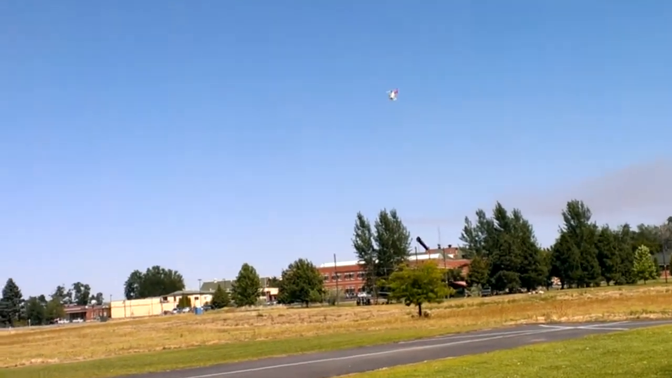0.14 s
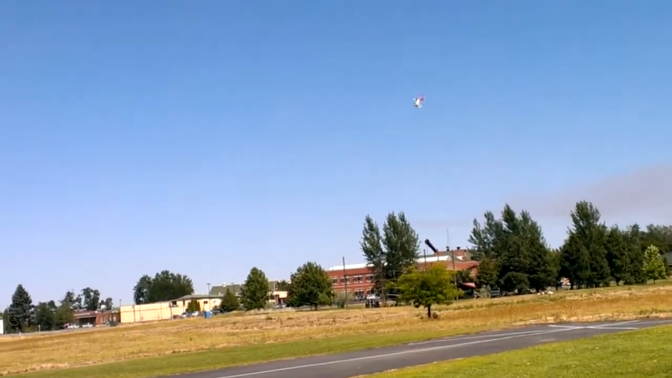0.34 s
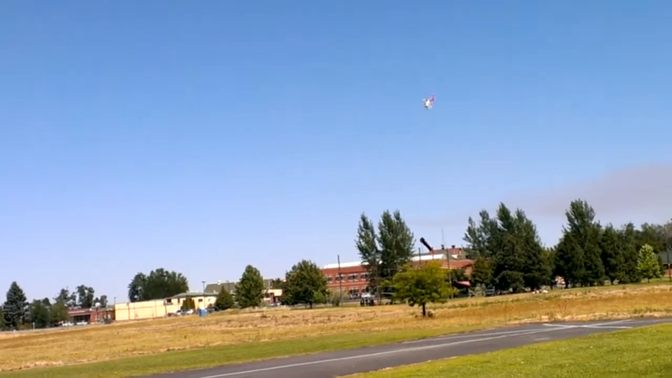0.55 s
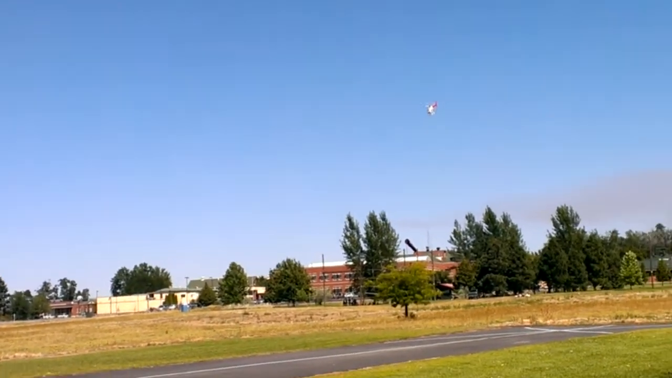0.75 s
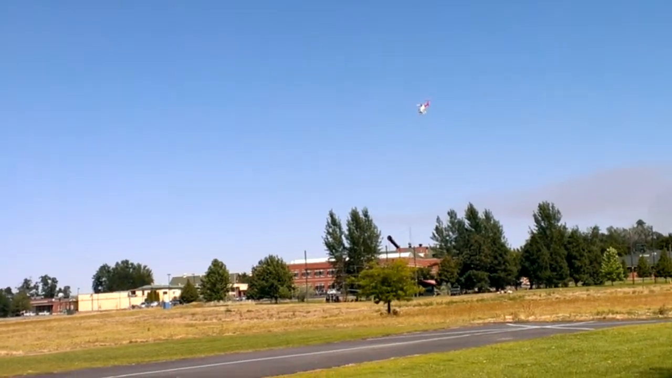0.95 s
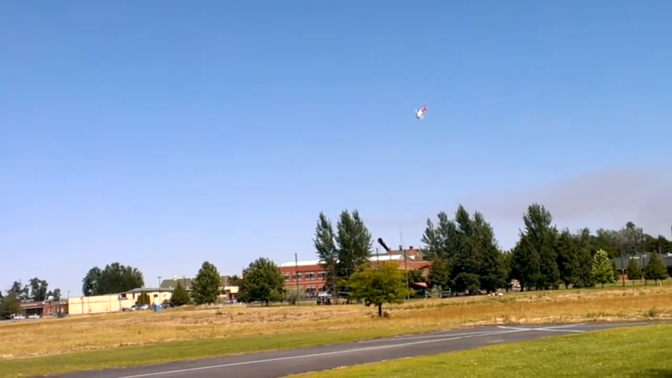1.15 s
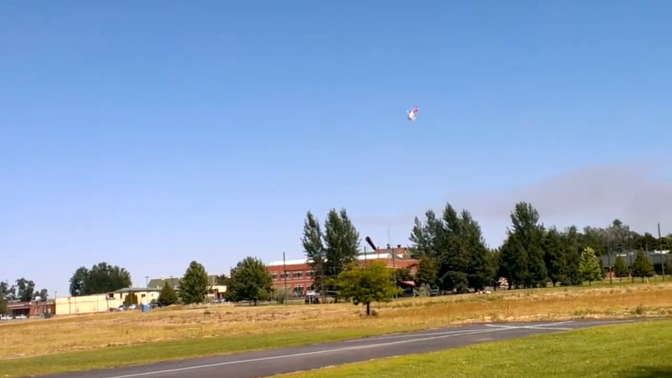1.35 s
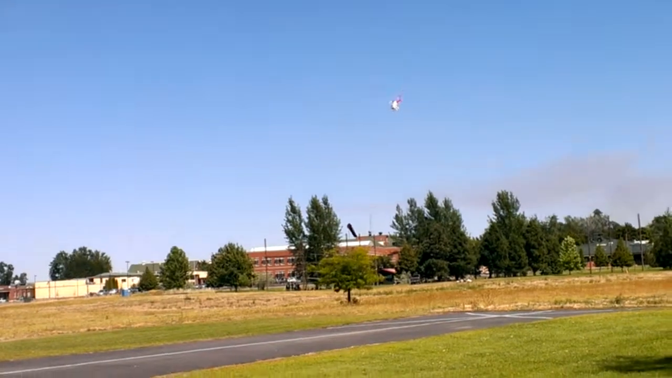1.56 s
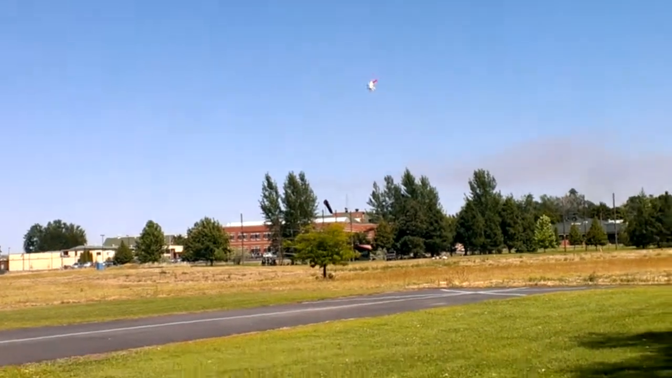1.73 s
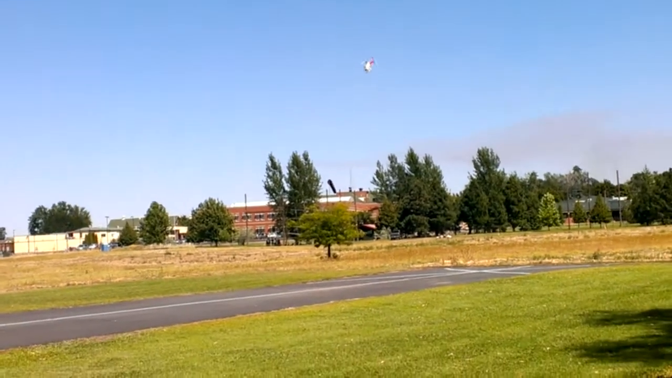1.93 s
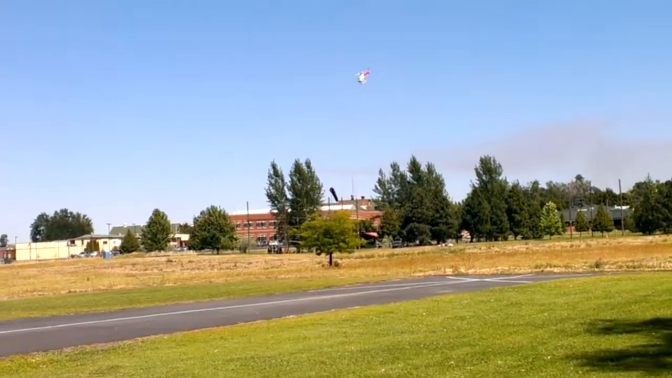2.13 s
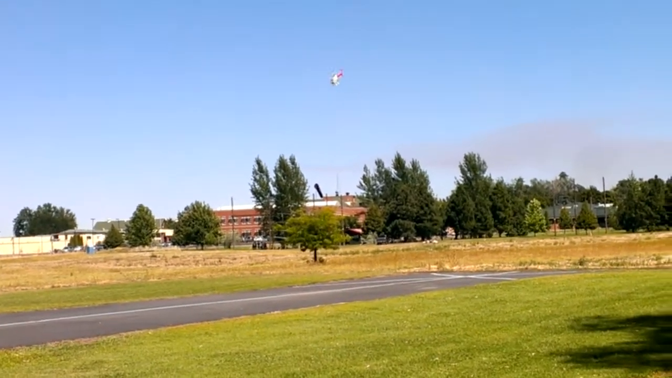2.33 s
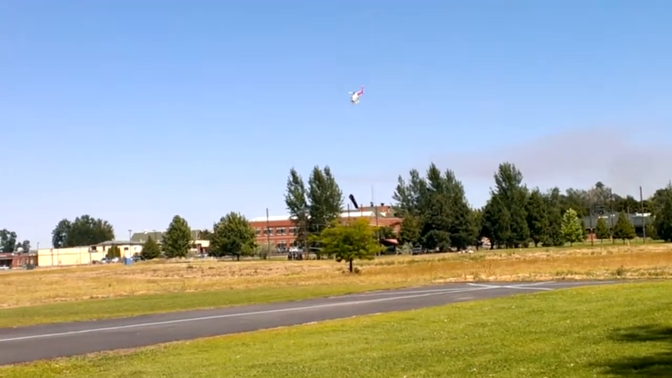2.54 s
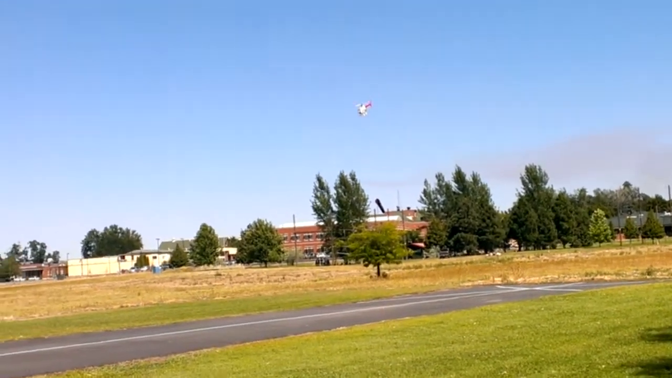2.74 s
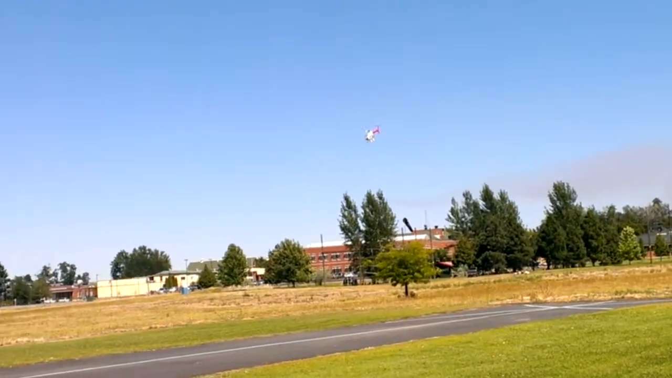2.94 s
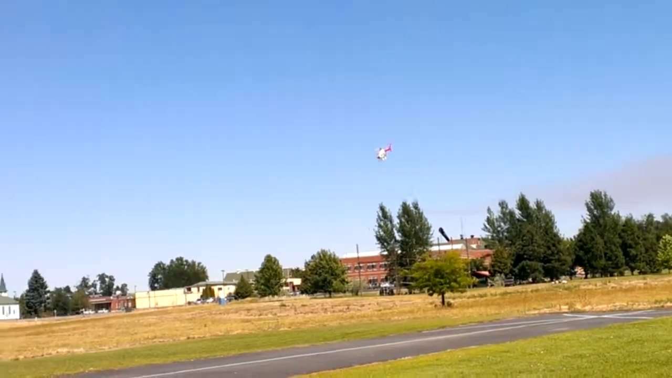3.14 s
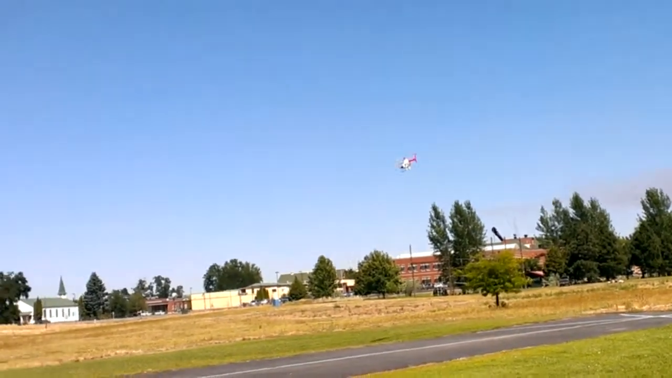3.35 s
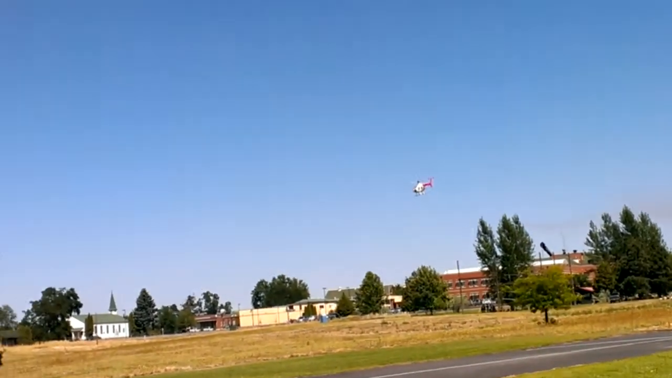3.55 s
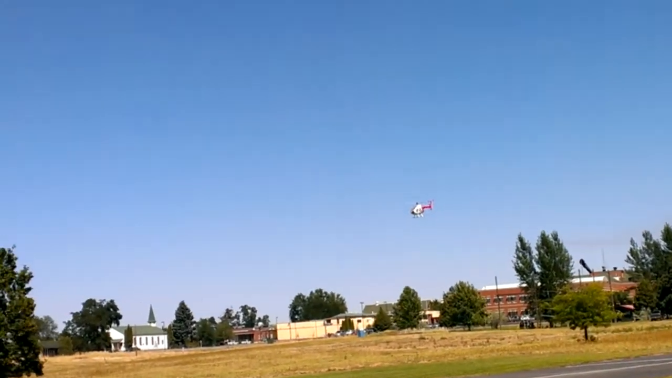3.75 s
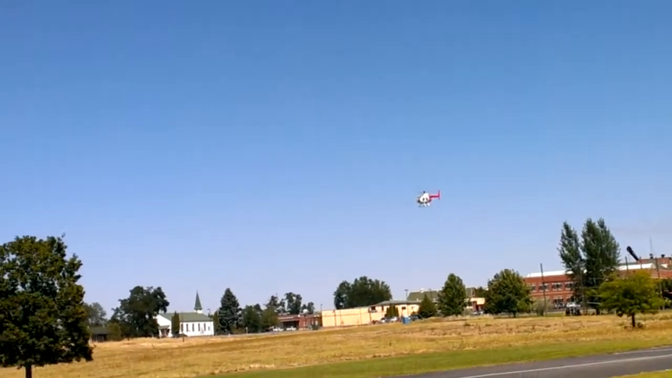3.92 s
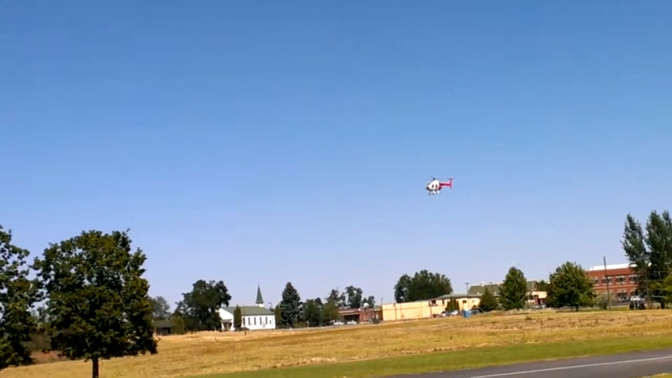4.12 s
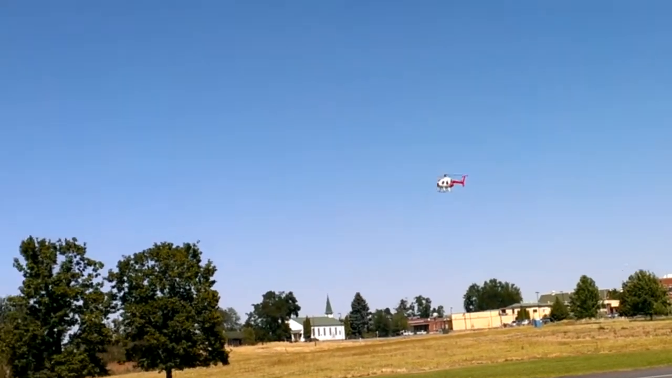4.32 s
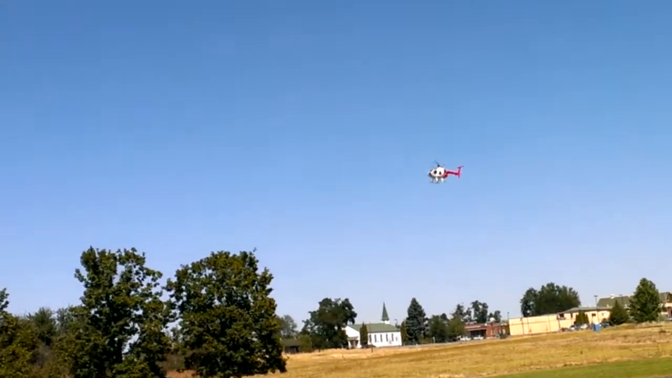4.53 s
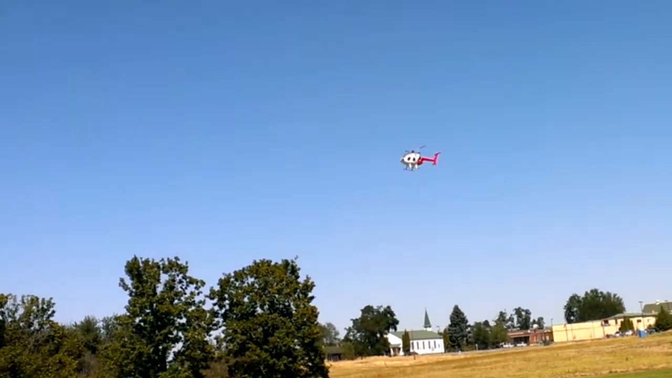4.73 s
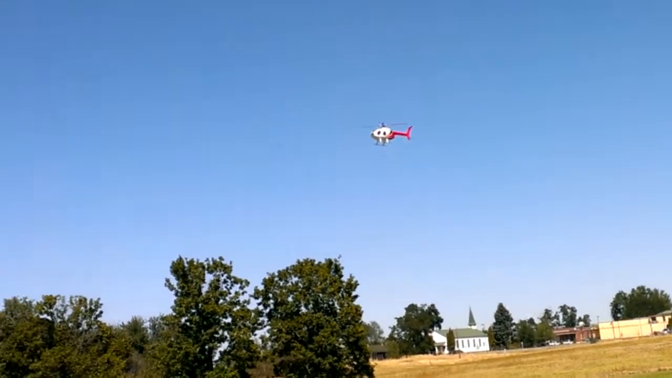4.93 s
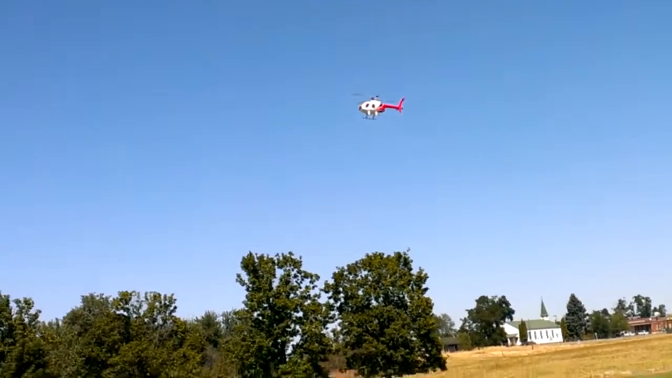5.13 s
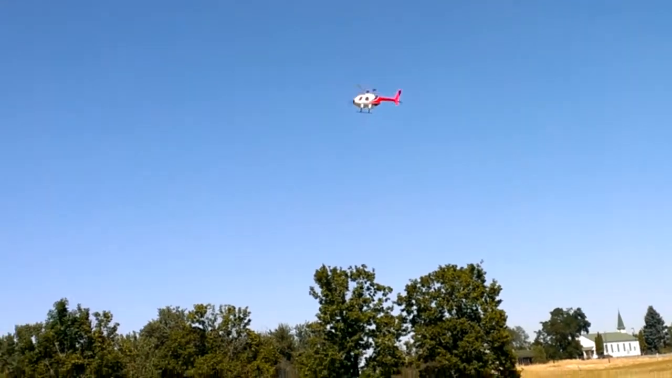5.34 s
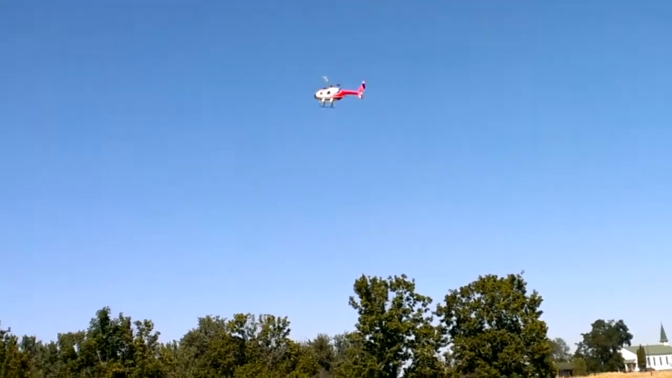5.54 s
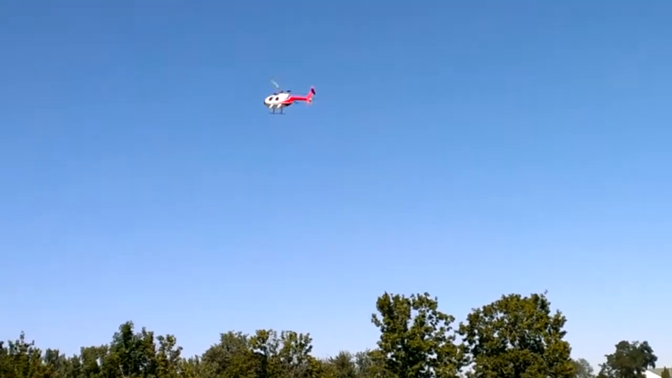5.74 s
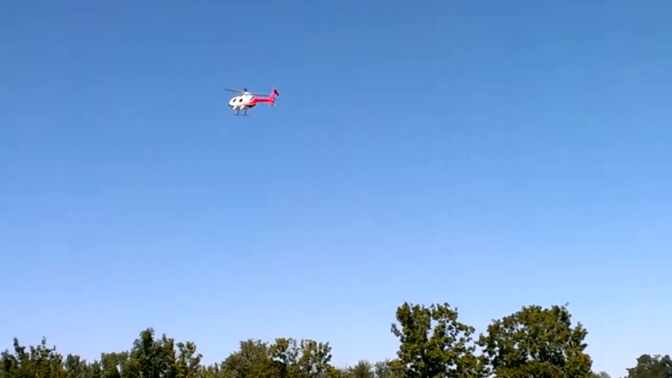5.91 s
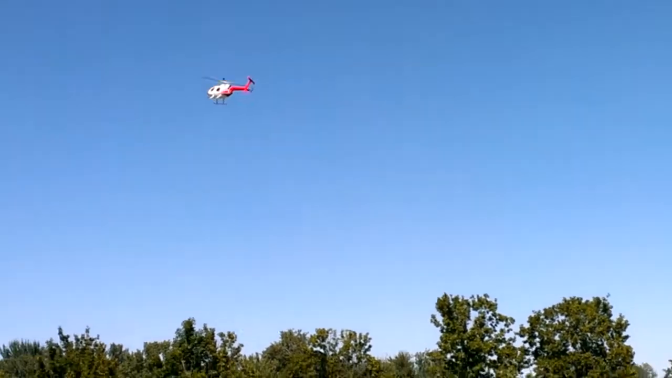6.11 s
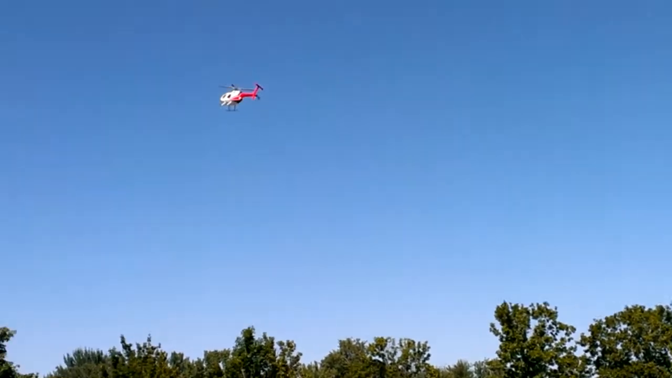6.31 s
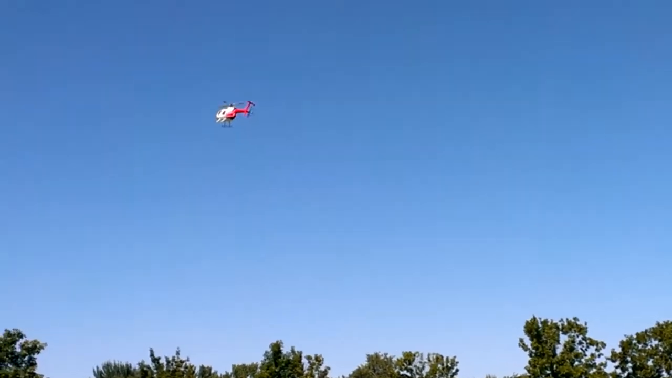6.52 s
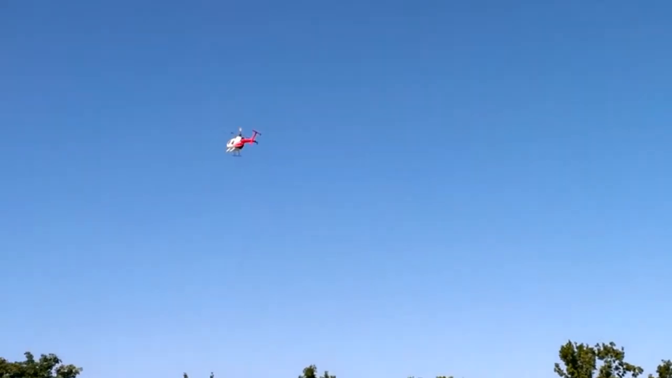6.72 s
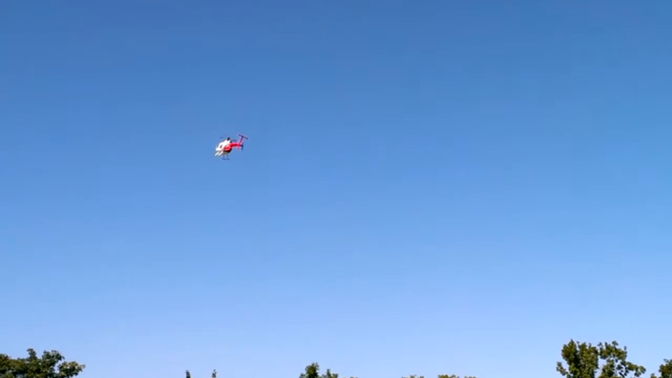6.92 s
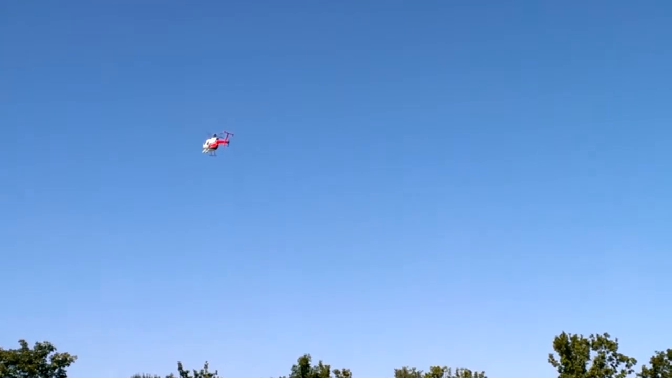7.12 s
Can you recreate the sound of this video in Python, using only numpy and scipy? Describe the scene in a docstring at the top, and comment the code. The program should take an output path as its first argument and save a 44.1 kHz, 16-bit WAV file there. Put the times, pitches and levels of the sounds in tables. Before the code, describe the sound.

Far off across an open field, the thin, wavering whine of a small electric model helicopter comes and goes. About three seconds in it becomes clearly louder, and it stays close as it flies over, its gears whining above a motor buzz and the airy rush of the blades. Brief puffs of wind bump the microphone during the approach and pass, with a very faint, thin electronic tone behind everything.

```python
"""A faint gear whine and hiss, far off over a grass field: a small electric model helicopter, which
flies in and passes over a single microphone. Its gears whine and its motor hums on multiples of the
rotor speed, tooth noise rings the frame, and the blades rush. An echo off the ground combs all but
the main whine. Close up, gusts thump on the microphone, over a thin electronic tone and faint hiss."""
import sys
import numpy as np
from scipy import signal
from scipy.fft import rfft, irfft, next_fast_len
from scipy.io import wavfile
from scipy.ndimage import uniform_filter1d

SR = 44100
rng = np.random.default_rng(int(sys.argv[2]) if len(sys.argv) > 2 else 0)


def transcribe(signal):
    """Save signal, clipped to [-1, 1], as a 16-bit WAV file at the path in sys.argv[1]."""
    frames = np.atleast_2d(signal).T
    limited = np.clip(frames, -1, 1)
    pcm = np.round(limited * 32767).astype(np.int16)
    wavfile.write(sys.argv[1], SR, pcm)


N = 316197

GEAR_TEETH, PINION_TEETH, TAIL_RATIO = 150, 13, 5
WHINE_MULTIPLES = GEAR_TEETH - TAIL_RATIO * np.arange(3)   # "multiple" always means of rotor speed
NEAR_SHARE = 0.57   # share of loss_db that rotor sidebands and overtones take

# Rotor speed as heard at the microphone: time_s, turns_per_s
ROTOR_SPEED = [(0, 38.352), (0.5, 38.057), (0.75, 38.239), (1.25, 38.48), (1.75, 38.656), (2.0, 38.807),
               (2.5, 39.324), (2.75, 39.423), (3.25, 39.363), (3.5, 39.489), (4.25, 39.395), (4.75, 39.526),
               (5.5, 39.485), (6.25, 39.483), (7.0, 39.63), (7.17, 39.607)]
# The approach from far off to overhead: time_s, gear_hiss_db, tip_hiss_db, rush_db
APPROACH = [(0, -48.5, -60.5, -62.5), (0.9, -57, -66.5, -60.5), (2.2, -45, -51, -54.5),
            (3.2, -42.5, -51.5, -50), (3.8, -32.5, -49, -44.5), (4.3, -37.5, -51.5, -47),
            (4.75, -34, -45, -40.5), (5.05, -35.5, -45.5, -45), (5.5, -33, -42, -42.5),
            (5.7, -33, -44, -41.5), (5.85, -34, -43.5, -37.5), (6.3, -31, -42.5, -37),
            (6.8, -35.5, -43, -39), (7.17, -39.5, -43.5, -40.5)]
# Swelling and sinking through the air, most at a distance: time_s, gain_db
AIR_FADING = [(0, -5.5), (1.04, 0), (1.165, 7.5), (1.29, 5.5), (1.415, -3.5), (1.54, -3), (1.665, 5),
              (1.79, -2), (1.915, -1), (2.165, -9.5), (2.29, -2), (2.54, 3.5), (2.665, -6.5), (2.79, -7.5),
              (2.915, 4), (3.04, 5), (3.165, 2), (3.4, -0.5), (3.6, 0.5), (3.95, -3), (4.15, 2), (4.3, 2),
              (4.5, 0.5), (4.7, 1.5), (4.85, -0.5), (5.25, 0.5), (5.5, 1.5), (6.1, 1.5), (6.55, -3),
              (6.85, -3), (7.17, -2)]
# Turbulence on the way to the microphone: time_s, mesh_phase_wander_cycles
TURBULENCE = [(0, .3), (1.5, .28), (2.6, .1), (3.8, .07), (4.3, .14), (5, .05)]
# Colour as the craft shows its side: time_s, lower_frame_db, upper_frame_db, overtones_db,
# motor_sidebands_db, rotor_sidebands_db, tail_sidebands_db, swish_db
ASPECT = [(0, 4, -5, -17, 1, 4, -10, -0.5), (1, 1, 0, -6, -7, 8.5, 11.5, -8),
          (2, -2, -1, -31, 4, 6, 9.5, -13), (2.6, -0.5, 4, -36, 12, 6.5, -3, -22),
          (3.1, -4, 3, -4, 3, 10.5, -1, -21), (3.6, -4, 6, -4.5, -14, 9.5, 3, -19),
          (3.85, -9, 7.5, 2.5, -9, 2, -3, -15), (4.1, 0, 9.5, 3.5, -6, 12, 11, -7),
          (4.3, -4, 6.5, 2.5, 1, 9, 8, -8), (4.6, -1.5, 5, -0.5, 5, 4.5, 13, -17),
          (5.2, 6, 5, -4.5, 4, 8, -4, -7), (5.5, -0.5, -5, -6, -5, -1, 7, -9),
          (5.8, 4, 3, 1, -3, -7, -3, -3.5), (6.1, 8, 2, -2.5, -6, -3, -3, -8),
          (6.4, 9.5, -1, 0, 4, 3, 6, -5.5), (6.7, 8, 15.5, 3, 8, 6, -4, -2),
          (7.17, 4, 0, -5.5, -16, -13, 3, -0.5)]
# Whine at the microphone: time_s, mesh_db, first_tail_sideband_db, second_tail_sideband_db
WHINE_LEVELS = [(0, -63, -66, -60), (0.27, -65.6, -61.8, -55.5), (0.5, -66, -57.5, -59),
                (0.7, -65, -60, -66), (0.9, -61.8, -54.9, -63.2), (1.2, -50.5, -48.7, -61.1),
                (1.45, -54.8, -60.4, -66.6), (1.7, -49.0, -52.0, -57.4), (2.05, -56.5, -60.7, -61.0),
                (2.4, -44.1, -51.2, -56.9), (2.55, -42.1, -48.9, -58.2), (2.75, -48.8, -52.0, -61.7),
                (3, -34.2, -45.1, -47.9), (3.3, -37.2, -54.3, -54.3), (3.6, -39.6, -51.1, -51.8),
                (3.85, -42.5, -48, -46.3), (4.05, -39.5, -46, -47.0), (4.2, -40, -35.5, -44),
                (4.4, -43, -36, -41.6), (4.55, -35.5, -41, -45.9), (4.75, -38.3, -43.4, -45.0),
                (5, -50.1, -32.0, -53.0), (5.25, -44.4, -31.2, -44.8), (5.5, -38.6, -33.8, -47.9),
                (5.7, -36.6, -33.0, -44.6), (5.9, -36.1, -38.4, -50.5), (6.1, -39.3, -38.6, -48.7),
                (6.3, -42.0, -38.7, -45.0), (6.55, -35.4, -40.2, -51.3), (6.8, -39.8, -46.7, -51.7),
                (7, -44.4, -42.8, -55.2), (7.17, -43.5, -43.8, -49.3)]
# Weaker tones round the mesh, relative to the gear hiss: multiple, level_db
MESH_SIDEBANDS = [(130, -23), (133.46, -21), (135, -20), (138.46, -18), (141, -15), (147, -13), (148, -12),
                  (149, -16), (151, -17), (152, -15), (154, -15), (155, -16), (158, -19), (160, -21),
                  (161.54, -16)]
# Frame and canopy resonances: pitch_hz, width_hz, gain_db
FRAME_MODES = [(4420, 1800, -11), (4794, 330, -1), (5207, 630, 1.5), (5873, 550, 5.5), (6260, 1340, -4.5)]
# Higher frame resonances, relative to the tip hiss: pitch_hz, width_hz, level_db
HIGH_FRAME_MODES = [(9200, 3600, -5), (10150, 860, -8), (12050, 2800, -6.5)]
# High gear tones, relative to the tip hiss: multiple, level_db
MESH_OVERTONES = [(212, -10), (217, -15), (285, -15), (288.46, -14), (290, -14), (295, -10), (300, -11)]
# Where the overtones are strongest: time_s, multiple
FAVOURED_OVERTONE = [(4.45, 295), (5, 289.5)]
# Motor hum, relative to the rush: time_s, shaft_db, octave_db, sideband_db, drone_db
HUM_LEVELS = [(0, 0.5, -7, 0.5, -15), (1.1, -8, -14, -7.5, -7.5), (2.0, -8.5, -29, -3.5, -11),
              (2.7, -15, -19, -21, -3.5), (3.4, -15.5, -8, -44, -11.5), (4.5, -9.5, -5.5, -22, -12.5),
              (5.2, -8, -19.5, -15, -13.5), (5.9, -18.5, -6, -16.5, 1), (6.4, -8.5, -17, -13, -19),
              (6.75, -12, -26, -8, -18), (7.17, -7, -36, -7.5, -9)]
# Motor and tail buzz, relative to the rush: multiple, level_db
BUZZ_TONES = [(15.8, -17), (20, -13), (25.46, -17), (34.62, -13), (46.15, -18), (57.69, -19)]
# Rise and fall of that buzz: time_s, gain_db
BUZZ_GAIN = [(0, -5.5), (1, -3.5), (3.6, -5), (4.2, -3.5), (4.8, -5), (5.7, -10), (6.7, -0.5), (7.17, 2.5)]
# Spectrum of the blade rush: frequency_hz, relative_density_db
RUSH_SPECTRUM = [(90, -19), (140, -18.5), (350, -6.5), (540, -4.5), (850, -0.5), (1030, -1.5), (1170, -1),
                 (1350, -4), (1700, -5.5), (2300, -0.5), (3400, -11.5), (4500, 0), (7000, -10)]
# Spectrum of the blade tip hiss: frequency_hz, relative_density_db
TIP_SPECTRUM = [(5000, 8), (7000, 7.5), (9000, 6.5), (11500, 1), (13500, 2.5), (16000, 1)]
# Echo off the grass: time_s, extra_path_ms, low_strength (0-1), treble_strength (0-1)
GRASS_ECHO = [(0, 1.45, .45, .2), (1.1, 1.42, .4, .2), (2.2, 1.2, .3, .25), (2.6, 1.08, .6, .45),
              (3.0, .96, .7, .55), (3.5, .86, .97, .85), (3.85, .82, .97, .9), (4.1, .83, 1, .85),
              (4.25, .86, 1, .6), (4.4, 1.12, 1, .45), (4.65, 1.21, 1, .7), (4.95, 1.38, .35, .1),
              (5.2, 1.87, .75, .15), (5.5, 2.05, .8, .3), (5.9, 2.24, .85, .3), (6.3, 2.27, .85, .2),
              (7.17, 2.2, .65, .35)]
# Puffs of wind on the microphone: peak_s, level_db, length_s
PUFFS = [(2.444, -54, 0.14), (2.691, -45.5, 0.079), (2.936, -39, 0.015), (3.022, -39, 0.022),
         (3.05, -35, 0.02), (3.644, -49, 0.044), (3.81, -39, 0.023), (3.893, -44.5, 0.1),
         (4.558, -42, 0.049), (4.626, -36.5, 0.047), (4.845, -45, 0.05), (4.916, -38, 0.021),
         (4.952, -41, 0.012), (5.626, -43, 0.03), (5.84, -44, 0.017), (5.88, -39, 0.027),
         (6.007, -47, 0.092), (6.147, -44, 0.033), (6.751, -47, 0.06), (6.912, -41, 0.051)]
# Steady wind between the puffs: time_s, level_db
BREEZE_LEVEL = [(0.0, -79), (0.6, -68), (1.7, -64.5), (2.6, -63), (4.2, -56), (4.93, -49.5), (5.39, -62),
                (7.17, -56)]
# Spectrum of wind on the microphone: frequency_hz, relative_density_db
WIND_SPECTRUM = [(20, -54), (45, -10), (70, -15), (130, 2.5), (220, -1.5), (330, -8), (480, -26)]
# Thin electronic tone: time_s, level_db
WHISTLE_LEVEL = [(0, -72), (3, -64), (5, -62.5), (7.17, -64)]
# Spectrum of the microphone's own hiss: frequency_hz, relative_density_db
MIC_HISS_SPECTRUM = [(300, 18), (3000, -9), (10000, -20), (13500, -14), (16000, -8)]


def helicopter():
    """Gears, motor and blades, all geared to one rotor, as they reach the microphone across the field."""
    turns = np.cumsum(in_time(ROTOR_SPEED)[0]) / SR
    fading_db = np.outer((1, 0.79, 0.43), in_time(AIR_FADING)[0])   # gears swing most, the rush least
    gear_db, tips_db, rush_db = in_time(APPROACH) + fading_db
    lower_db, upper_db, overtones_db, *groups_db, swish_db = in_time(ASPECT)
    gears = gear_hiss(turns, lower_db, upper_db) + sidebands(turns, lower_db, *groups_db)
    highs = tip_hiss(turns) + amp(overtones_db) * gear_overtones(turns)
    body = blade_rush(swish_db) + motor_hum(turns)
    direct = amp(gear_db) * gears + amp(rush_db) * body + amp(tips_db) * highs
    return ground_bounce(direct) + whine(turns)


def whine(turns):
    """The gear mesh and two tail-drive sidebands below it, with a rasp that grows with turbulence."""
    levels_db = in_time(WHINE_LEVELS)
    rasp_db = np.max(levels_db, axis=0) - 14 + 7 * in_time(TURBULENCE)[0]
    mesh = tones(turns, zip(WHINE_MULTIPLES, levels_db), fade_db=0.63)
    return mesh + amp(rasp_db) * rasp(turns, favoured_multiple(), half_width_hz=95)


def gear_hiss(turns, lower_db, upper_db):
    """Uneven tooth contact rings the frame and canopy, beating with the rotor and tail shaft."""
    hiss = 0
    for hz, width_hz, db in FRAME_MODES:
        side_db = lower_db * (hz < 5600) + upper_db * (hz > 6000)
        hiss += ringing(hz, width_hz, widen=1.43) * amp(db + side_db + 1.3 * drift(9.6))
    running_rms = np.sqrt(uniform_filter1d(hiss ** 2, size=SR // 2))
    steady = hiss / running_rms   # turning shifts the colour, not the loudness
    return steady * throb(turns, [(1, .15), (2, .25), (TAIL_RATIO, .25)])


def sidebands(turns, lower_db, motor_db, rotor_db, tail_db):
    """Motor, tail and rotor sidebands of the mesh; each family changes as the craft turns."""
    centre = favoured_multiple()
    partials = []
    for multiple, db in MESH_SIDEBANDS:
        if multiple % 1:
            family_db = motor_db
        elif multiple % TAIL_RATIO == 0:
            family_db = tail_db
        else:
            family_db = rotor_db + NEAR_SHARE * loss_db(multiple, centre)
        frame_db = lower_db * (multiple < WHINE_MULTIPLES[-1])   # the lowest follow the lower resonances
        partials.append((multiple, db + frame_db + family_db))
    return tones(turns, partials, fade_db=1.8)


def gear_overtones(turns):
    """Overtones of the mesh, with tooth noise ringing the higher frame resonances."""
    rings = sum(amp(db + 2.8 * drift(9.3)) * rms_one(ringing(hz, width_hz, widen=3.1))
                for hz, width_hz, db in HIGH_FRAME_MODES)
    centre, = in_time(FAVOURED_OVERTONE)
    partials = [(multiple, db + NEAR_SHARE * loss_db(multiple, centre)) for multiple, db in MESH_OVERTONES]
    return rings + tones(turns, partials, fade_db=3.5) + amp(-13) * rasp(turns, centre, half_width_hz=110)


def blade_rush(swish_db):
    """Air rushing over the blades, with a thin swish off their edges; lows and highs flicker apart."""
    swish = rms_one(ringing(hz=3640, width_hz=2000, widen=1))
    air = coloured(RUSH_SPECTRUM) + amp(swish_db) * swish
    deep = lowpass(air, hz=1150)
    return deep * amp(3.2 * drift(7.0)) + (air - deep) * amp(1.4 * drift(17.5))


def tip_hiss(turns):
    """The blade tips hiss, pulsing twice a turn."""
    return coloured(TIP_SPECTRUM) * throb(turns, [(2, .15)]) * amp(0.72 * drift(15.0))


def motor_hum(turns):
    """The motor's shaft tone, its octave, a drone and the motor and tail buzz, chopped by the blades."""
    shaft, drone = GEAR_TEETH / PINION_TEETH, 16.97   # multiples
    shaft_db, octave_db, sideband_db, drone_db = in_time(HUM_LEVELS)
    hum = tones(turns, [(shaft, shaft_db), (2 * shaft, octave_db), (drone, drone_db)], fade_db=1.5)
    hum += amp(in_time(BUZZ_GAIN)[0]) * tones(turns, BUZZ_TONES, fade_db=2.5)
    hum += amp(sideband_db) * rasp(turns, shaft - 2, half_width_hz=7)
    hum += amp(octave_db - 6) * rasp(turns, 2 * shaft, half_width_hz=61)
    return hum * throb(turns, [(1, .3), (2, .25)])


def ground_bounce(direct, flip_ms=.84, cycles_per_ms=1.0):
    """The microphone gets the direct sound minus a late, duller, phase-turned copy off the grass."""
    path_ms, strength, treble = in_time(GRASS_ECHO)
    phase_cycles = np.minimum(cycles_per_ms * (path_ms - flip_ms), .46)   # zero is a clean flip
    path_ms = path_ms * (1 + .02 * drift(3))   # warm air over the grass bends the path
    dull, bright = lowpass(direct, hz=2800), lowpass(direct, hz=7000)
    strength = np.clip(strength + .02 * drift(4.0), 0, 1)
    treble = np.clip(treble + .2 * drift(6.0), 0, 1)   # comes and goes over uneven grass
    analytic = signal.hilbert(strength * dull + treble * (bright - dull), next_fast_len(N))[:N]
    late = np.interp(np.arange(N) - path_ms * SR / 1000, np.arange(N), analytic)
    echo = np.real(late * np.exp(2j * np.pi * phase_cycles))
    return (direct - echo) / np.sqrt(1 + strength ** 2)


def wind():
    """Eddies right on the microphone port: a lumpy rumble, and a higher thump in each puff."""
    time = np.arange(N) / SR
    breeze = amp(in_time(BREEZE_LEVEL)[0] + 3.43 * drift(6.1))
    puffs = sum(amp(db) * np.exp(-(2 * (time - peak_s) / length_s) ** 2) for peak_s, db, length_s in PUFFS)
    rumble = coloured(WIND_SPECTRUM)
    thump = rms_one(resonance(coloured(WIND_SPECTRUM), hz=212, width_hz=560))
    return breeze * rumble + puffs * thump


def whistle(pitch_hz=15000):
    """A thin electronic tone at a steady pitch."""
    return np.sqrt(2) * amp(in_time(WHISTLE_LEVEL)[0]) * np.sin(2 * np.pi * pitch_hz * np.arange(N) / SR)


def microphone_hiss(level_db=-70.5):
    """The microphone's own noise floor."""
    return amp(level_db) * coloured(MIC_HISS_SPECTRUM)


def favoured_multiple():
    """The multiple on which the whine's power is centred."""
    power = amp(in_time(WHINE_LEVELS)) ** 2
    return WHINE_MULTIPLES @ power / power.sum(axis=0)


def loss_db(multiple, favoured):
    """How much a tone drops for lying away from the favoured multiple."""
    return np.maximum(-2.5 * (multiple - favoured) ** 2, -9.5)


def tones(turns, partials, fade_db):
    """Sines on (multiple, level_db) rows; moving air makes them fade, flutter and wander in phase."""
    wander, = in_time(TURBULENCE)
    total = 0
    for multiple, db in partials:
        cycles = multiple * turns + rng.random() + wander * np.sqrt(multiple / GEAR_TEETH) * drift(6.6)
        level_db = db + fade_db * drift(5.7) + 1.93 * drift(23.0)
        total += np.sqrt(2) * amp(level_db) * np.sin(2 * np.pi * cycles)
    return total


def rasp(turns, multiple, half_width_hz):
    """A narrow band of noise riding on a multiple; rms 1."""
    noise = rms_one(signal.lfilter(*signal.butter(2, half_width_hz, fs=SR), rng.standard_normal(N)))
    cycles = np.cumsum(multiple * np.gradient(turns))
    return np.sqrt(2) * noise * np.sin(2 * np.pi * cycles)


def throb(turns, beats):
    """Gain that beats with the shafts, from (multiple, depth) rows."""
    return 1 + sum(depth * np.cos(2 * np.pi * (multiple * turns + rng.random()))
                   for multiple, depth in beats)


def ringing(hz, width_hz, widen):
    """Noise through two resonances at one pitch, the second widen times as wide."""
    return resonance(resonance(rng.standard_normal(N), hz, width_hz), hz, widen * width_hz)


def resonance(x, hz, width_hz):
    """Two-pole peak with gain 1 on top."""
    r = np.exp(-np.pi * width_hz / SR)
    feedback = [1, -2 * r * np.cos(2 * np.pi * hz / SR), r * r]
    return signal.lfilter(np.array([1, 0, -1]) * (1 - r * r) / 2, feedback, x)


def lowpass(x, hz):
    """Treble roll-off with no phase shift."""
    return signal.filtfilt(*signal.butter(2, hz, fs=SR), x)


def coloured(spectrum):
    """Noise with the given spectrum; rms 1."""
    size = next_fast_len(N)
    hz, db = np.transpose(spectrum)
    bins_hz = np.arange(1, size // 2 + 2) * SR / size
    shape_db = np.interp(np.log(bins_hz), np.log(hz), db, left=-90, right=-90)
    return rms_one(irfft(rfft(rng.standard_normal(size)) * amp(shape_db), size)[:N])


def drift(rate_hz, hop=40, settle=2000):
    """Random wander of spread 1, changing about rate_hz times a second."""
    r = np.exp(-2 * np.pi * hop * rate_hz / SR)
    slow = signal.lfilter([1], [1, -2 * r, r * r], rng.standard_normal(N // hop + settle + 2))[settle:]
    return np.interp(np.arange(N) / hop, np.arange(len(slow)), rms_one(slow))


def in_time(rows):
    """Columns of a timed table as curves, one value a sample."""
    time_s, *columns = np.transpose(rows)
    return [np.interp(np.arange(N) / SR, time_s, column) for column in columns]


def amp(db):
    """Gain of a level in dB."""
    return 10 ** (np.asarray(db) / 20)


def rms_one(x):
    """Scale to rms 1."""
    return x / np.sqrt(np.mean(x ** 2) + 1e-20)


def scene():
    """One microphone in the field feeds both channels."""
    mono = helicopter() + wind() + whistle() + microphone_hiss()
    return np.array([mono, mono])


def record(dry):
    """A steep high cut after the microphone."""
    cutoff_hz = 15680
    return signal.sosfilt(signal.ellip(14, .3, 75, cutoff_hz, fs=SR, output="sos"), dry)


dry = scene()
out = record(dry)
transcribe(out)
```